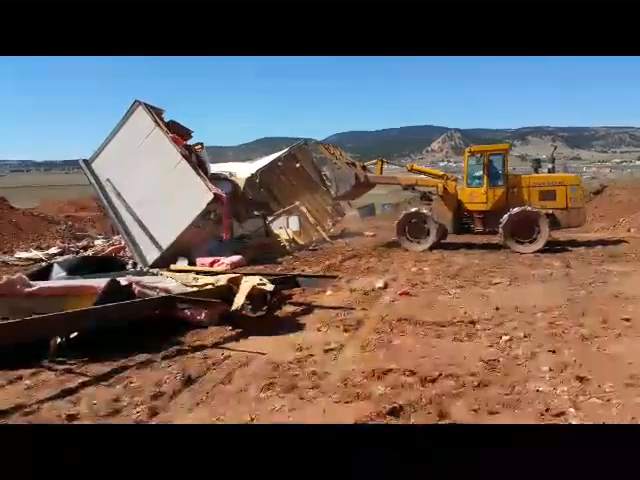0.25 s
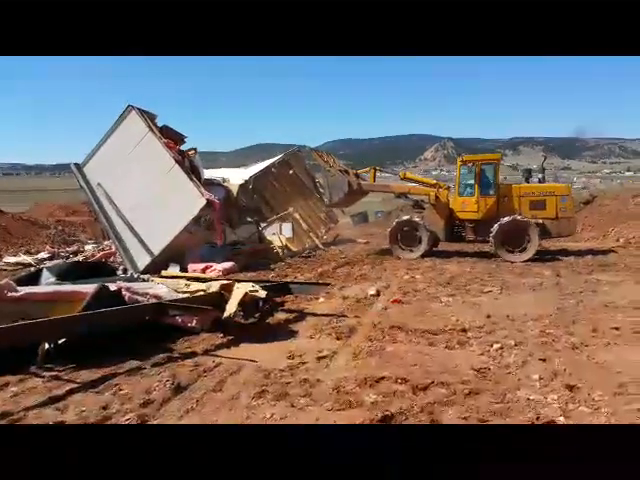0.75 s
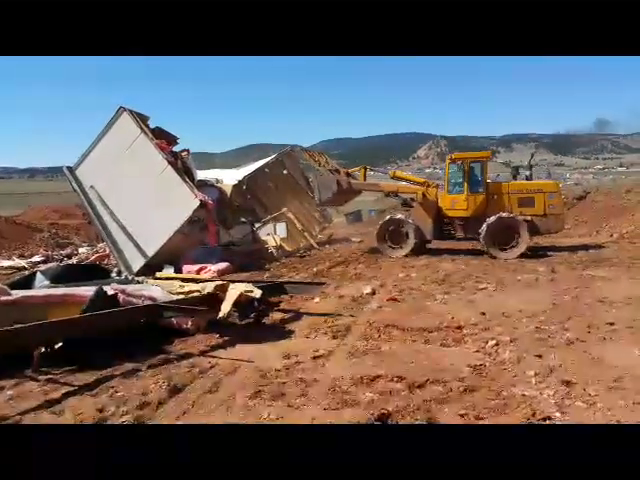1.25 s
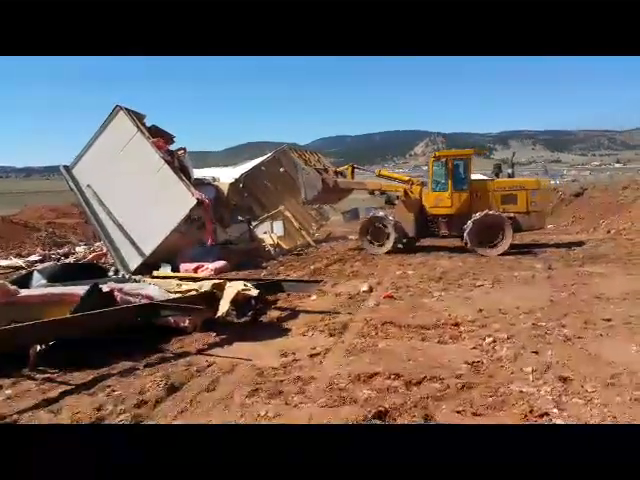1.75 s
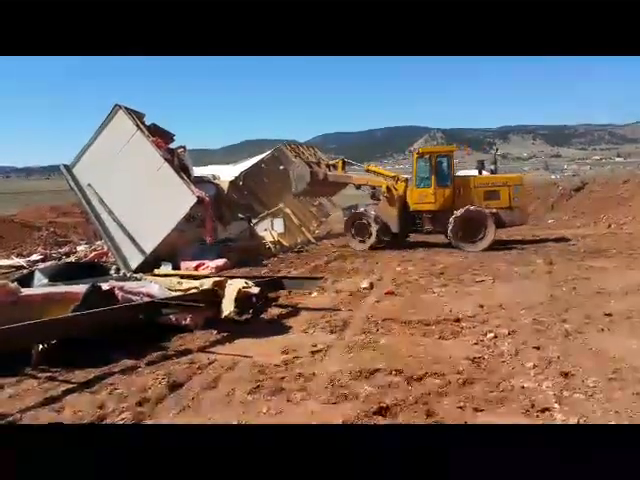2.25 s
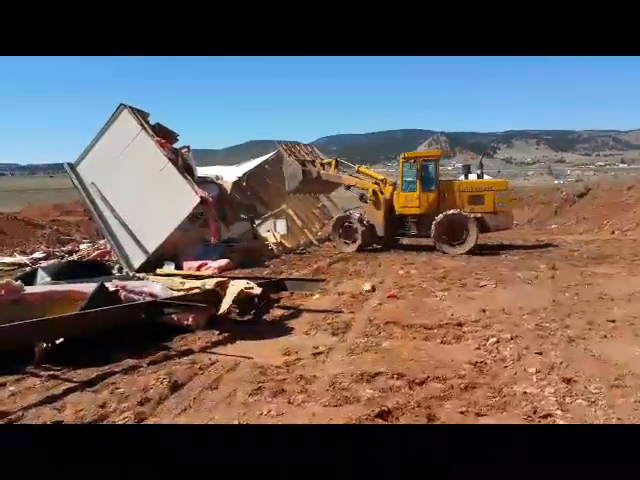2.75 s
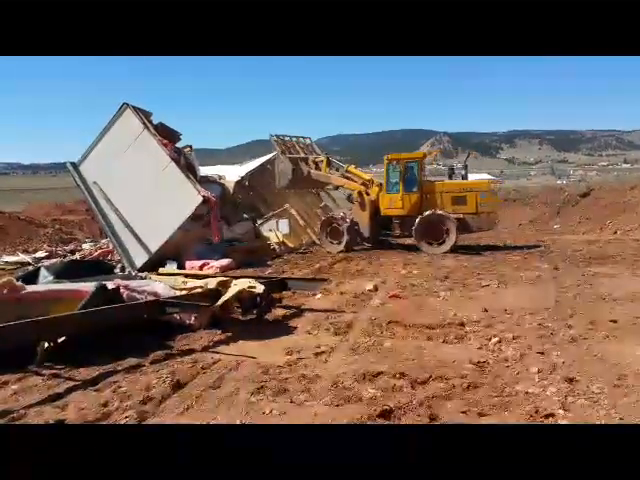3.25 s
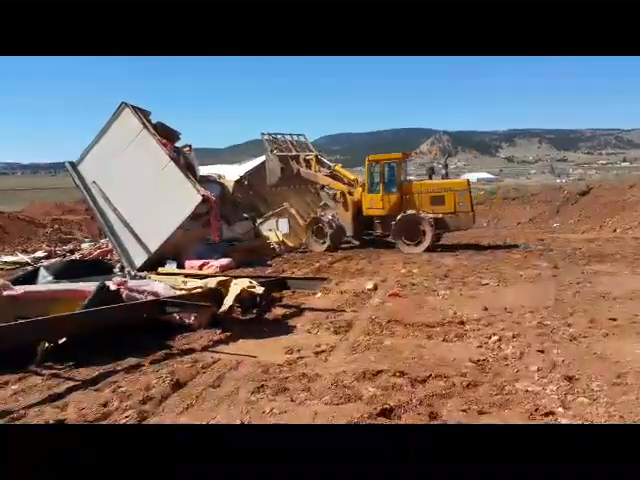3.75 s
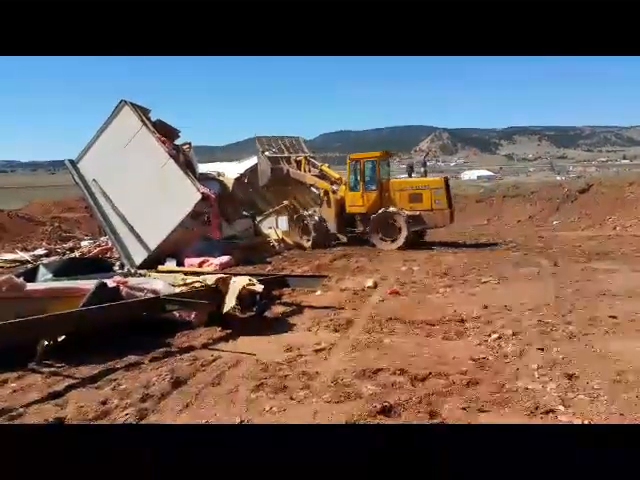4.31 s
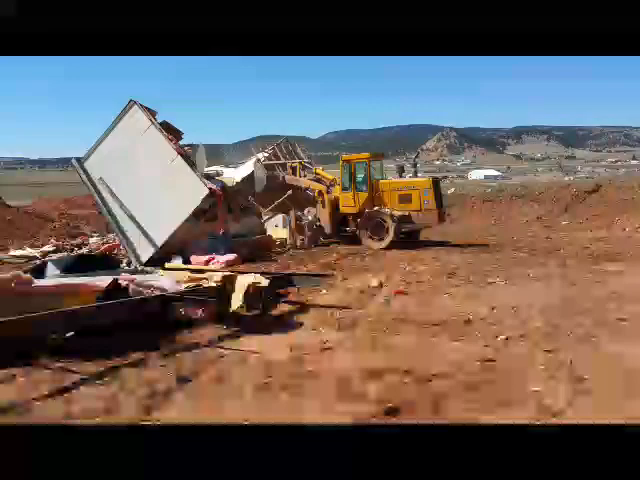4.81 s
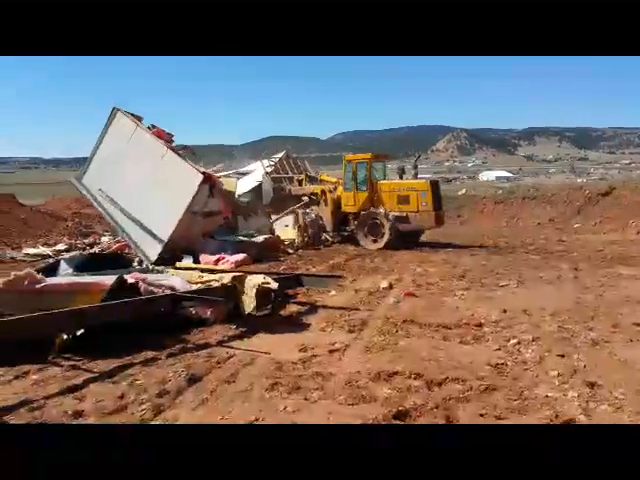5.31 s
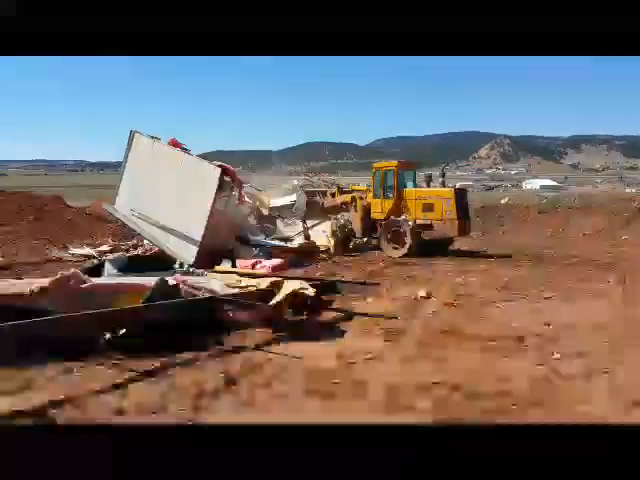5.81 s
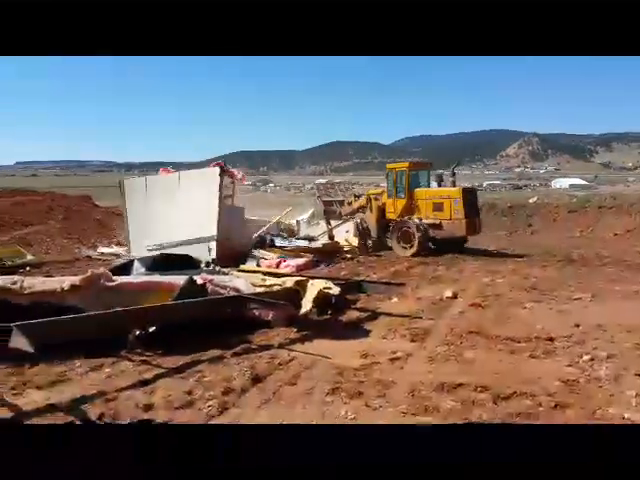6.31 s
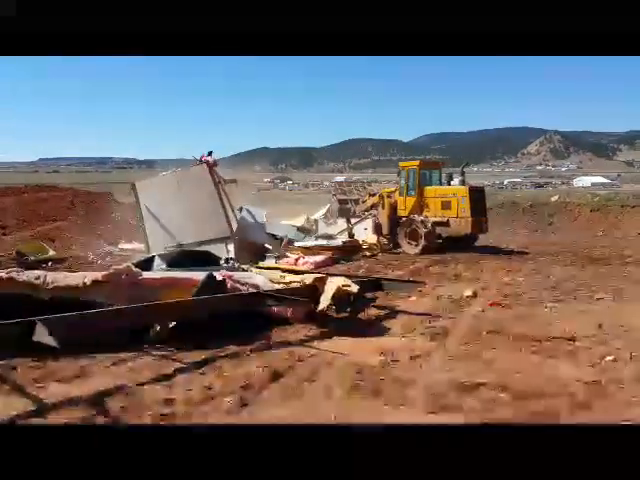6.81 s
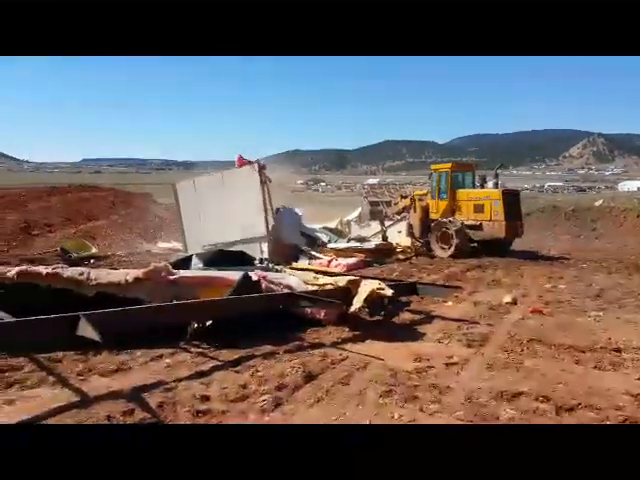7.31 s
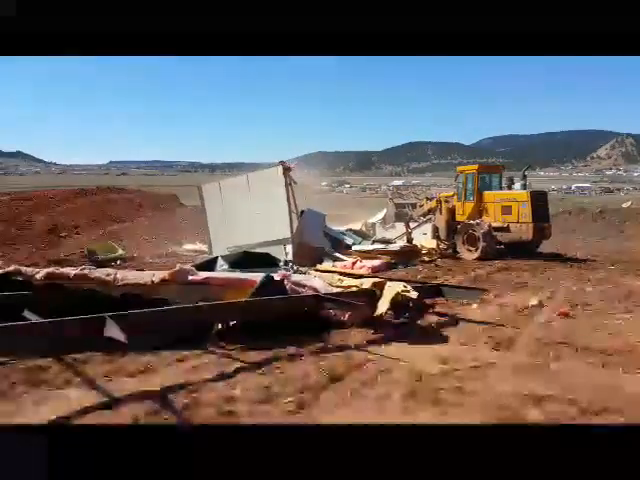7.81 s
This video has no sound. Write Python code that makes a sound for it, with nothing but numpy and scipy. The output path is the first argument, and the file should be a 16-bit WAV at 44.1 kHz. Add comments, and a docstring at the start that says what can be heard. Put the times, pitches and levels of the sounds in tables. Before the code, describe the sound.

On open ground, wind buffets the microphone while a diesel wheel loader some way off idles roughly, then revs up with a thin squeal and gear whine. Studs crack separately, then a dense burst of snapping timber, hollow panel thuds and bright splinters follows as the mobile home topples. Debris clatters dwindle and the engine slows.

```python
"""Open ground: a diesel wheel loader revs up with a squeal and drives its bucket into an overturned mobile
home. The engine sums exhaust tones, a fan or pump tone and pulsing noise clatter; squeal and gear whine are
wavering sines. Studs snap one by one, then walls splinter and the shell topples with a long crunch: random
fractures drive filters for shell, timber and splinters, with ringing chips and bright ticks on top. Gusts
buffet the microphone throughout, as filtered noise in low rumble and higher flutter."""
import sys
import numpy as np
from scipy import signal
from scipy.fft import rfft, irfft, next_fast_len
from scipy.io import wavfile
from scipy.ndimage import uniform_filter1d, minimum_filter1d, map_coordinates

SR = 44100
rng = np.random.default_rng(int(sys.argv[2]) if len(sys.argv) > 2 else 0)


def int16_out(signal):
    """Quantize to a 16-bit WAV file."""
    q = np.round(np.clip(np.atleast_2d(signal).T, -1, 1) * 32767)
    wavfile.write(sys.argv[1], SR, q.astype(np.int16))


N = 355446  # length in samples


def amp(db):
    """Decibels to gain."""
    return 10 ** (np.asarray(db) / 20)


def unit(x):
    """Scale to rms 1."""
    return x / np.sqrt(np.mean(x ** 2) + 1e-20)


def along(points, hz):
    """(Hz, value) points read on a log frequency axis."""
    f, v = np.transpose(points)
    return np.interp(np.log(hz + 1), np.log(f + 1), v)


def curves(rows):
    """One value per sample for each column after the time."""
    seconds, *columns = np.transpose(rows)
    return [np.interp(np.arange(N) / SR, seconds, column) for column in columns]


def during(rows, fade=0.009):
    """1 over the span of a table, fading to 0 outside it in fade seconds."""
    t = np.arange(N) / SR
    inside = np.minimum(t - rows[0][0], rows[-1][0] - t)
    return np.clip(1 + inside / fade, 0, 1)


def wobble(rate):
    """A smooth random curve, rate knots a second."""
    knots = rng.standard_normal(int(N * rate / SR) + 4)
    return map_coordinates(knots, [np.arange(N) * rate / SR])


def turns(hz):
    """Running phase in radians of a moving frequency."""
    return 2 * np.pi * np.cumsum(hz) / SR


def swell(start, length, attack, release):
    """Rise linearly, hold until the length is over, die away exponentially; all times in seconds."""
    age = np.arange(N) / SR - start
    return np.clip(age / attack, 0, 1) * np.exp(-np.maximum(age - length, 0) / release)


def colour(x, spectrum, size=4096):
    """Causal (minimum-phase) filter of unit energy with the given spectrum."""
    cepstrum = irfft(np.log(amp(along(spectrum, np.fft.rfftfreq(size, 1 / SR)))))
    # fold the cepstrum onto positive times, so that nothing sounds early
    cepstrum[1:size // 2] *= 2
    cepstrum[size // 2 + 1:] = 0
    pulse = irfft(np.exp(rfft(cepstrum)))
    pulse /= np.linalg.norm(pulse)
    return signal.oaconvolve(x, pulse[None], axes=1)[:, :N]


# Echo decay of the surroundings, shared by loader and wreck.
# Each row: frequency in Hz, time to fall 60 dB in seconds.
ECHO_DECAY = [(200, 0.39), (1000, 0.16), (3000, 0.18), (8000, 0.031)]


def outdoors(x, wet_db, count=4):
    """Direct sound plus short stereo echoes, whose paths keep changing as things move."""
    t = np.arange(N) / SR
    out = np.array([x, x])
    for k in range(count):
        hz, age, noise = signal.stft(rng.standard_normal((2, SR // 3)), SR, nperseg=256)
        decay = amp(-60 * age / along(ECHO_DECAY, hz)[:, None])
        tail = signal.istft(noise * decay, SR, nperseg=256)[1]
        tail /= np.linalg.norm(tail[0])
        share = x * np.sin(np.pi / 2 * np.minimum((t * 10 - k) % count, 2))  # the paths cross-fade in turn
        out += amp(wet_db) * signal.oaconvolve(share[None], tail, axes=1)[:, :N]
    return out / np.hypot(1, amp(wet_db))


# Balance of the sides by frequency: the left leads in much of the middle, the right above 6 kHz.
# Each row: frequency in Hz, left minus right in dB.
SIDE_BALANCE = [(400, -4.5), (900, 2.5), (2000, 4.5), (2450, 9), (2950, 8), (3400, 15), (3750, -9.5),
                (4300, 16), (5000, 16.5), (5900, -1), (6600, -38), (8000, -23), (10500, -7.5)]


def hollow(pair, lag, to_left, to_right):
    """Each side also hears the other a lag (in seconds) later: a wide, slightly hollow image."""
    size = next_fast_len(N + 512)
    hz = np.fft.rfftfreq(size, 1 / SR)
    sides = rfft(pair, size)
    cross = np.array([[to_left], [to_right]])
    crossed = cross * sides[::-1] * np.exp(-2j * np.pi * hz * lag)
    sides = (sides + crossed) / np.hypot(1, cross)
    tilt = amp(along(SIDE_BALANCE, hz) * np.array([[.5], [-.5]]))
    return irfft(sides * tilt, size)[:, :N]


def fractures(rate, spread_db):
    """Impulses of rms 1 at random times: many small fibres give way, and a few large ones."""
    chance = rng.random(N)
    strength = np.minimum(rng.exponential(1, N), 4)
    return unit((chance < rate / SR) * amp(spread_db * strength) * rng.choice([-1, 1], N))


# The engine's run. Each row: time in seconds, firing rate in Hz,
# exhaust drone and clatter, each a relative level in dB.
ENGINE_RUN = [(0, 43.6, -37, -31.5), (.32, 43.3, -40, -38.5), (.62, 44, -45, -35.5),
              (.87, 60.1, -38, -32.5), (1.35, 73.2, -35, -31), (1.7, 78.13, -38.5, -27),
              (1.88, 80.2, -24.5, -31), (2.15, 79.87, -33, -29.5), (2.85, 80.42, -32, -31),
              (3.33, 81.75, -31.5, -28.5), (3.7, 80.7, -30, -29), (4, 81.8, -29, -27),
              (4.3, 81.6, -31, -30), (5.6, 81.23, -48, -36.5), (6.4, 80.45, -38, -29),
              (7.55, 65.35, -48.5, -40.5), (8.06, 55.36, -31, -32.5)]
# Tones locked to the engine's speed: exhaust tones, and at 2.42 a fan or pump driven off the engine. Each row:
# multiple of the firing rate, relative level in dB.
ENGINE_TONES = [(1, 0), (1.503, -14.5), (2, -9), (2.42, 1.5), (3, -13.5)]
# Spectrum of the combustion clatter. Each row: frequency in Hz, relative density in dB per Hz.
CLATTER_COLOUR = [(260, -15.5), (480, -11), (850, -2), (1050, -2.5), (1250, -10), (1450, 0), (1650, -10.5),
                  (1880, -5.5), (2200, -6), (2500, -11), (2900, -14.5), (3750, -18), (4300, -19.5),
                  (4900, -51.5), (7000, -53), (7700, -81)]


def engine():
    """Exhaust tones with a fan or pump tone, and combustion clatter that pulses at each firing."""
    firing_hz, drone_db, clatter_db = curves(ENGINE_RUN)
    phase = turns(firing_hz * (1 + 0.0047 * wobble(13)))
    drone = sum(amp(db + 2 * wobble(18)) * np.sin(multiple * phase + .4 * wobble(25))
                for multiple, db in ENGINE_TONES)
    beats = 1 + 0.34 * np.cos(phase) + 0.12 * np.cos(phase / 2)
    pulsing = beats * rng.standard_normal(N)
    clatter = unit(colour(outdoors(pulsing, wet_db=0.0), CLATTER_COLOUR))
    return amp(drone_db) * drone + amp(clatter_db + 4.0 + 0.53 * wobble(11.0)) * clatter


# The breeze between gusts. Each row: time in seconds, relative strength in dB.
BREEZE = [(0, -36.5), (.3, -29.5), (.85, -33), (1.25, -23.5), (2.3, -25.5), (2.85, -22), (3.1, -25.5),
          (3.5, -28.5), (4.1, -31.5), (4.4, -28.5), (4.85, -34), (5.5, -39.5), (5.9, -34), (6.25, -29.5),
          (6.8, -31.5), (7.1, -28), (7.32, -36), (7.75, -20.5), (8.06, -34)]
# Gusts. Each row: start in seconds, length in seconds, relative strength in dB, share of flutter in dB.
GUST_HITS = [(0.089, .04, -26, -5), (0.18, 0.029, -20.5, -14), (0.386, 0.015, -24, 0.5),
             (0.44, 0.03, -25.5, 3.5), (0.632, 0.13, -25, -6), (0.91, 0.053, -22.5, -9.5),
             (1.034, 0.084, -26.5, 3), (1.172, 0.17, -28.5, 2), (1.458, 0.2324, -25, 0),
             (1.811, 0.197, -22.5, 0), (2.127, 0.11, -22, -1.5), (2.324, .15, -29, 3),
             (2.545, 0.16, -24.5, 2), (2.724, 0.058, -24.5, 0), (2.844, 0.01, -8, -5.5),
             (2.925, 0.0087, -19, -0.5), (3.167, 0.019, -25, 2.5), (3.29, 0.011, -27.5, 6.5),
             (3.34, .13, -25.5, -1.5), (3.506, 0.11, -26, -1.5), (3.759, 0.073, -28, 2),
             (3.852, 0.071, -27, -1), (4.19, 0.09, -20.5, -3), (4.377, 0.03, -26.5, -25),
             (4.705, 0.03, -27.5, -9), (6.128, 0.078, -26.5, -6), (6.543, 0.09, -24, -7),
             (6.907, 0.038, -26.5, -25), (7.207, 0.029, -21, -11.5), (7.36, 0.064, -22.5, 5),
             (7.436, 0.078, -22, -1.5), (7.535, 0.05, -19, 0.5), (7.661, 0.012, -17, 0.5),
             (7.704, 0.063, -19, -4), (7.792, 0.086, -23, -2), (7.887, .072, -20, -6)]
# Spectra of the wind's low rumble and higher flutter. Each row: frequency in Hz, relative density in dB per Hz.
RUMBLE_COLOUR = [(15, -35.5), (30, -10.5), (55, -3), (90, 2), (150, 0.5), (230, -5.5), (400, -18.5),
                 (900, -50.5), (2000, -94)]
FLUTTER_COLOUR = [(60, -40.5), (150, -8.5), (250, 1.5), (400, -0.5), (600, -5), (900, -14), (1400, -26),
                  (3000, -39), (6000, -103.5)]
GUST_ATTACK_S, GUST_RELEASE_S = 0.0054, .018
# flutter drive at the reference breeze strength, and its dB per dB of breeze
BREEZE_REF_DB, BREEZE_FLUTTER_DB, FLUTTER_GROWS = -26, -31, 1
SWAY_DB, SWAY_PER_S = 0.5, 31  # random unevenness of the breeze: depth, knots a second


def wind():
    """Gusts ride on an uneven breeze; eddies hit the two microphone ports separately, as rumble and flutter."""
    breeze_db = curves(BREEZE)[0] + SWAY_DB * wobble(SWAY_PER_S)
    rumble_level = amp(breeze_db)
    flutter_level = amp(BREEZE_FLUTTER_DB + FLUTTER_GROWS * (breeze_db - BREEZE_REF_DB))
    for start, length, db, flutter_db in GUST_HITS:
        gust = amp(db) * swell(start, length, GUST_ATTACK_S, GUST_RELEASE_S)
        rumble_level = np.hypot(rumble_level, gust)  # powers add
        flutter_level = np.hypot(flutter_level, amp(flutter_db) * gust)
    eddies = np.tanh(np.array([wobble(60), wobble(60)]))
    rumble_noise = colour(rng.standard_normal((2, N)), RUMBLE_COLOUR)
    rumble = amp(3.5) * rumble_level * unit(amp(2.0 * eddies) * rumble_noise)
    flutter_noise = colour(rng.standard_normal((2, N)), FLUTTER_COLOUR)
    flutter = amp(4.5) * flutter_level * unit(amp(4.5 * eddies) * flutter_noise)
    return rumble + flutter * amp([[1.5], [-1.5]])  # flutter leans left


# The drive squeals on pulling away. Each row: start in seconds, length in seconds, relative level in dB.
DRIVE_SQUEALS = [(0.605, .585, -32), (7.78, .35, -36)]
# Two modes of the squeal: the upper speaks first, then gives way. Each row: frequency in Hz, width in Hz,
# relative level in dB, attack in seconds (before squaring), sag in dB per second.
SLIP_MODES = [(3070, 220, 0, .27, 0), (3440, 340, 2, .15, 11)]
SQUEAL_RELEASE_S = 0.1  # before squaring


def squeal():
    """Slipping friction in the drive chatters on two close modes, which mix into a faint octave."""
    out = np.zeros(N)
    t = np.arange(N) / SR
    for hz, width, mode_db, attack, sag in SLIP_MODES:
        slip = np.zeros(N)
        for start, length, db in DRIVE_SQUEALS:
            sagging = amp(db - sag * np.maximum(t - start, 0))
            slip += sagging * swell(start, length, attack, SQUEAL_RELEASE_S) ** 2
        phase = turns(hz + 20 * wobble(22) + width / 2 * wobble(3 * width))
        tone = np.sin(phase) + amp(-28.5) * np.sin(2 * phase)
        out += amp(mode_db) * slip * unit(tone * amp(3 * wobble(160)))
    return outdoors(out, wet_db=4.5)


def piece(t, hz, spread, count=16, ring_t60=.011, ring_share=0.4):
    """A broken piece rings briefly at modes scattered round its pitch; a larger spread scatters them wider."""
    places = (np.arange(count)[:, None] + rng.random((count, 1))) / count
    modes = hz * np.exp(spread * (2 * places - 1))
    ring = np.sin(2 * np.pi * modes * t).sum(0) * amp(-60 * t / ring_t60)
    return (t == 0) + ring_share * ring / np.linalg.norm(ring)


# The loudest breaks of timber and panels. Each row: start in seconds, relative strength in dB,
# share of thud in dB, share of splinters in dB, tearing time in seconds, ring of the piece in Hz.
BREAKS = [(1.177, -9, -3.5, -38, 0.016, 1994), (3.245, -4, -7, -35.5, .016, 2270),
          (3.474, -2, -3, -39.5, 0.03, 2004), (3.725, -4.5, -6, -33, 0.016, 2344),
          (3.893, 0.5, 2.5, -43, .04, 2305), (4.146, -9, -2, -20.5, 0.0091, 2747),
          (4.471, -8, 0.5, -9.5, .008, 2656), (4.483, -5, -2, -10.5, 0.0084, 3000),
          (4.513, -16, 7, -0.5, 0.015, 2510), (4.533, -14, -7, -4.5, 0.016, 3840),
          (4.555, -14.5, -4.5, -7.5, 0.0087, 1960), (4.582, -2, -0.5, -14, .007, 2300),
          (4.598, -8.5, 5, -14, .014, 1920), (4.63, -6.5, -5.5, -16, .013, 2570),
          (4.672, -8, -7.5, -14, .007, 3420), (4.716, -9.5, -6, -16.5, 0.022, 2110),
          (4.772, -17.5, -2, -9.5, 0.0019, 1863), (4.826, -10, -4, -15, 0.016, 2260),
          (4.867, -7.5, -4.5, -27.5, 0.014, 1890), (4.903, -11.5, -2.5, -13.5, 0.0032, 2130),
          (4.935, -15, 3, -15, 0.02, 2603), (4.986, -12.5, 5, -8.5, 0.012, 2720),
          (5.003, -9, -5, -7, 0.015, 2390), (5.021, -13.5, -9.5, -16.5, 0.0051, 1652),
          (5.08, -8, -0.5, -12, 0.015, 2900), (5.115, -18.5, 8, -20, 0.0054, 1748),
          (5.152, -10, -5.5, -17.5, 0.048, 1745), (5.201, -13.5, -18, -9, 0.011, 1980),
          (5.235, -14, 2, -13.5, 0.026, 3060), (5.37, -7.5, -3.5, -14, 0.052, 2180),
          (5.51, -18.5, 4.5, -15.5, 0.0037, 1916), (5.628, -15.5, -3.5, -7.5, .035, 2008),
          (5.734, -8, -2, -19, 0.054, 2530), (5.779, -9, -4, -19.5, 0.0098, 1900),
          (5.852, -10.5, 0.5, -22, 0.0084, 1784), (6.199, -15, -5, -5.5, 0.029, 3018),
          (6.257, -13.5, 2, -5.5, 0.011, 3200), (6.29, -12, -9, -14.5, 0.0039, 1570),
          (6.313, -11.5, -9.5, -15, 0.011, 2033), (6.334, -10.5, -4, -9, 0.026, 1960),
          (6.362, -6.5, 0, -14, 0.02, 2635), (6.407, -4.5, -16, -39, 0.0081, 1660),
          (6.438, -4, -6, -34, 0.0046, 1698), (6.463, -6.5, -4.5, -26.5, 0.042, 1856),
          (6.594, -9, -0.5, -17.5, 0.016, 1910), (6.637, -17.5, 2, -13, 0.0081, 2285),
          (6.683, -23, -6, -8, 0.0047, 2722), (6.76, -9.5, -13, -15, 0.045, 1758),
          (6.841, -20, -12, -5, 0.012, 2327), (6.901, -28, 5, -16.5, 0.0062, 2120),
          (7.038, -10.5, -2, -17.5, 0.038, 2080), (7.448, -16.5, -9, -23, 0.019, 2047)]
# Spectra of the hollow shell, the timber and the fine splinters.
# Each row: frequency in Hz, relative density in dB per Hz.
SHELL_COLOUR = [(150, -38.5), (400, 2), (520, -5), (680, 4.5), (950, 2.5), (1250, -6.5), (1700, -15),
                (3500, -69.5)]
TIMBER_COLOUR = [(500, -29.5), (1100, -6.5), (1500, -0.5), (1950, 0), (2600, 2), (3200, -6.5), (3750, -4),
                 (4300, -9), (4900, -29.5), (6000, -82)]
SPLINTER_COLOUR = [(2300, -39), (3200, 16.5), (3750, 21), (4400, 9.5), (5300, 13.5), (5900, 10.5),
                   (6400, -4.5), (7100, 5.5), (7600, -29), (8400, -51), (12000, -57)]


def cracks():
    """Each break is a quickly swelling, dying run of fibre fractures that drives shell, timber and splinters."""
    drive = np.zeros((3, N + SR))
    t = np.arange(SR // 4) / SR
    for start, db, thud_db, splinter_db, tear, hz in BREAKS:
        rise = 1 - .3 * np.exp(-t / (.1 * tear))
        fibres = rng.choice([-1, 1], len(t)) * (rng.random(len(t)) < .12)
        tearing = fibres * rise * np.exp(-t / tear)
        ringing = piece(t, hz, spread=min(.3 + 9 * tear, 1))  # long tears scatter wider
        burst = signal.fftconvolve(tearing, ringing)[:len(t)]
        burst /= np.linalg.norm(burst)
        shares_db = np.array([[thud_db], [0], [splinter_db]])
        drive[:, round(start * SR):][:, :len(t)] += amp(db + shares_db) * burst
    thud, timber, splinter = drive[:, :N]
    return (amp(11.5) * colour(outdoors(thud, wet_db=-6.5), SHELL_COLOUR)
            + amp(14.5) * colour(outdoors(timber, wet_db=-7.0), TIMBER_COLOUR)
            + amp(24.5) * colour(outdoors(splinter, wet_db=-4), SPLINTER_COLOUR))


# The gears whine under load. Each row: start in seconds, length in seconds, relative level in dB.
GEAR_WHINES = [(1.602, 0.909, -32.5), (2.623, 1.18, -30)]
WHINE_ORDER = 13.6  # gear mesh rate over firing rate
WHINE_ATTACK_S, WHINE_RELEASE_S = 0.5, 0.097


def gears():
    """A thin, slightly wavering transmission whine, geared to the engine's speed."""
    hz = WHINE_ORDER * curves(ENGINE_RUN)[0] + 2.38 * wobble(40)
    load = sum(amp(db) * swell(start, length, WHINE_ATTACK_S, WHINE_RELEASE_S)
               for start, length, db in GEAR_WHINES)
    return load * amp(1.4 * wobble(15)) * np.sin(turns(hz))


# Brittle bits that snap in direct view. Each row: start in seconds, relative level in dB.
BRITTLE_SNAPS = [(4.48, 13), (4.652, 7.5), (5.513, -15), (6.042, -7), (6.065, -3.5), (6.083, -5),
                 (6.107, -8), (6.124, 3.5), (6.257, -14), (6.27, -13.5), (7.447, -12)]
# Spectrum of a brittle tick. Each row: frequency in Hz, relative density in dB per Hz.
BRITTLE_COLOUR = [(400, -30.5), (900, 0.5), (2000, 10), (4000, 20), (7000, -0.5), (8200, -15.5),
                  (9500, -40), (10800, 12), (12200, -29.5)]


def snaps(life=.0016):
    """Thin brittle pieces give short, dry, bright ticks: noise bursts that decay over life seconds."""
    drive = np.zeros(N + SR)
    t = np.arange(SR // 50) / SR
    for start, db in BRITTLE_SNAPS:
        tick = np.exp(-t / life) * rng.standard_normal(len(t))
        drive[round(start * SR):][:len(t)] += amp(db - 19.5) * tick
    return colour(outdoors(drive[:N], wet_db=-14.5), BRITTLE_COLOUR)


# How hard the walls are being crushed. Each row: time in seconds, relative effort in dB.
CRUSH_EFFORT = [(4.5, -25), (4.78, -27), (5.05, -24), (5.3, -25.5), (5.5, -34.5), (5.7, -29.5), (5.93, -37),
                (6.08, -28), (6.3, -31.5), (6.48, -28), (6.7, -23.5), (6.9, -37), (7.2, -38.5),
                (7.36, -39.5)]
# what the crushing drives
CRUSH_PANEL_DB, CRUSH_FIBRE_DB, CRUSH_SPLINTER_DB, CRUSH_CHIP_DB = -3, -3, -9.5, -16


def crunch():
    """Clumps of small fractures as panels fold and debris slides; one crushing effort drives them all."""
    effort_db, = curves(CRUSH_EFFORT)
    t = np.arange(SR // 20) / SR
    slips = signal.fftconvolve(np.abs(fractures(rate=160, spread_db=2)), np.exp(-t / .0025))[:N]
    clumps = amp(effort_db) * during(CRUSH_EFFORT) * unit(.45 + unit(slips))
    panels = clumps * fractures(rate=730, spread_db=1.5)
    fibres = clumps * fractures(rate=3200, spread_db=0.5)
    return (colour(outdoors(panels * amp(CRUSH_PANEL_DB), wet_db=-8.5), SHELL_COLOUR)
            + colour(outdoors(fibres * amp(CRUSH_FIBRE_DB), wet_db=-4.5), TIMBER_COLOUR)
            + colour(outdoors(fibres * amp(CRUSH_SPLINTER_DB), wet_db=-1), SPLINTER_COLOUR))


def chips(count=300, centre_hz=2400, spread=0.55, ring_t60=0.011, spread_db=2.0):
    """Small bits fly off all through the crushing, each clacking at its own pitch."""
    out = np.zeros(N + SR)
    t = np.arange(SR // 30) / SR
    first, last = CRUSH_EFFORT[0][0], CRUSH_EFFORT[-1][0]
    for when, pitch, size in rng.random((count, 3)):
        start = first + when * (last - first)
        hz = centre_hz * np.exp(spread * (2 * pitch - 1))
        size_db = -spread_db * np.log(max(size, .05))  # a few loud chips among many soft
        clack = amp(size_db - 60 * t / ring_t60) * np.sin(2 * np.pi * hz * t)
        out[round(start * SR):][:len(t)] += clack
    driven = unit(out[:N]) * amp(curves(CRUSH_EFFORT)[0] + CRUSH_CHIP_DB)
    return colour(outdoors(driven, wet_db=-4.0), TIMBER_COLOUR)


def scene():
    """The loader and the wreck some way off, the wind close by."""
    loader = hollow(engine() + squeal() + gears(), lag=.00103, to_left=.25, to_right=.5)
    wreck = hollow(cracks() + snaps() + crunch() + chips(), lag=.00106, to_left=.15, to_right=1.1)
    return loader + amp(-1.0) * wreck + wind()


TOP_HZ = 12200  # band limit


def record(dry):
    """The camera turns down the highest peaks and keeps nothing above its band limit."""
    needed = np.minimum(1, .95 / (np.abs(dry).max(0) + 1e-9))
    gain = uniform_filter1d(minimum_filter1d(needed, size=441), size=441)  # 10 ms hold, then 10 ms smoothing
    size = next_fast_len(N + 8192)
    in_band = np.fft.rfftfreq(size, 1 / SR) < TOP_HZ
    return irfft(rfft(dry * gain, size) * in_band, size)[:, :N]


dry = scene()
out = record(dry)
int16_out(out)
```